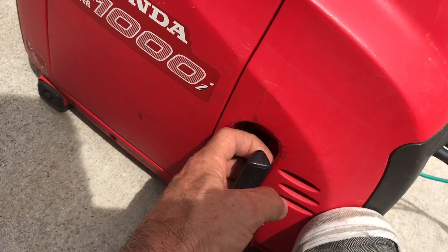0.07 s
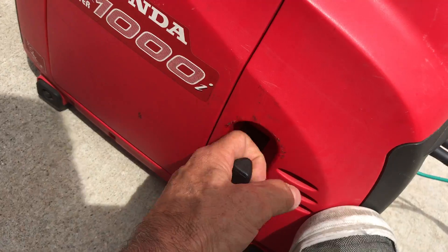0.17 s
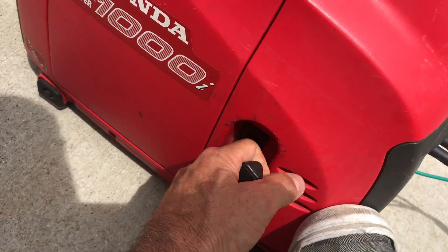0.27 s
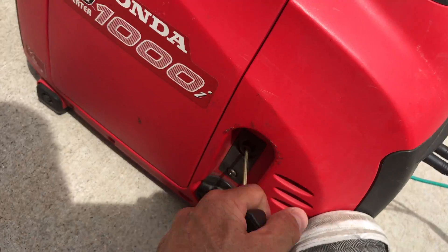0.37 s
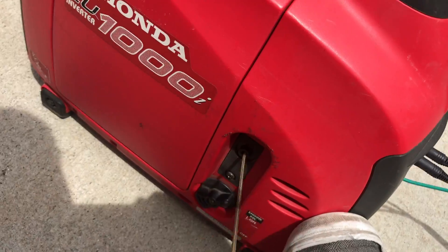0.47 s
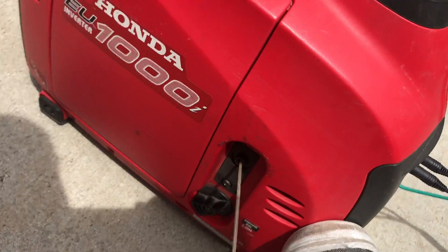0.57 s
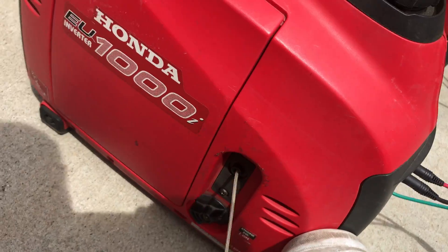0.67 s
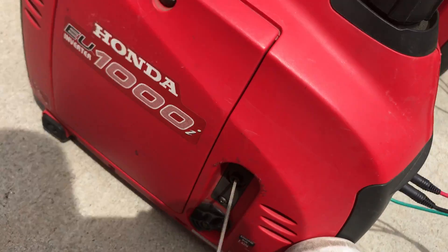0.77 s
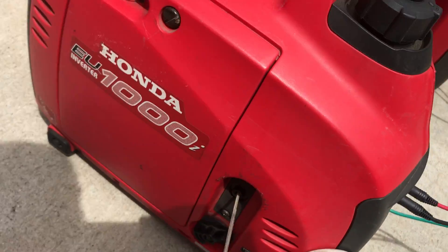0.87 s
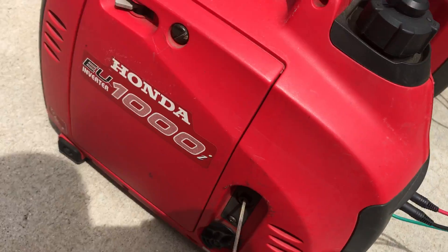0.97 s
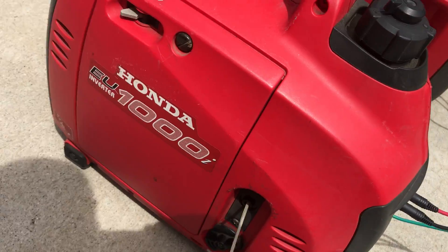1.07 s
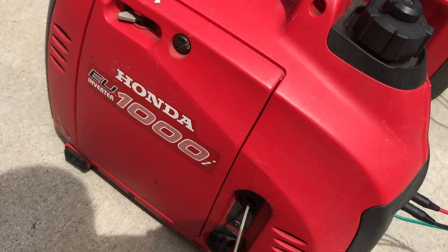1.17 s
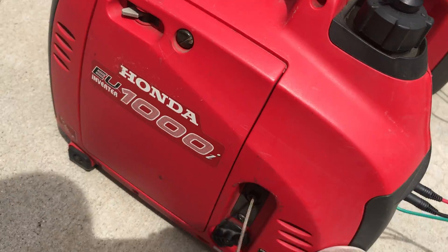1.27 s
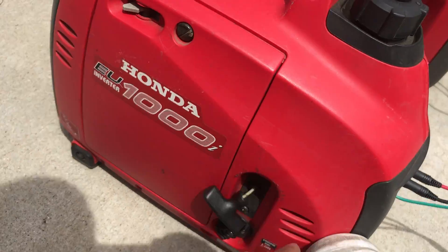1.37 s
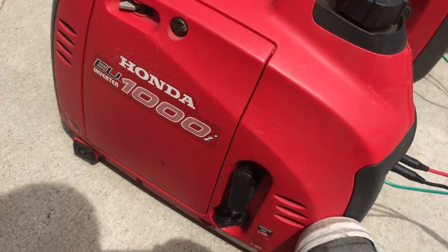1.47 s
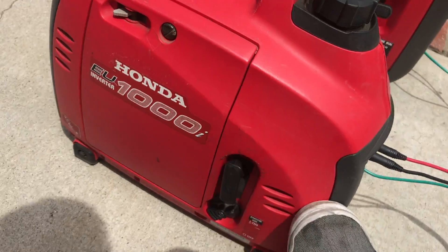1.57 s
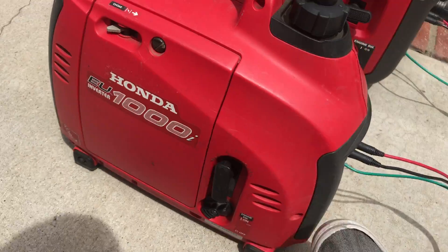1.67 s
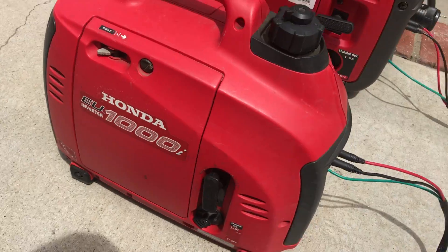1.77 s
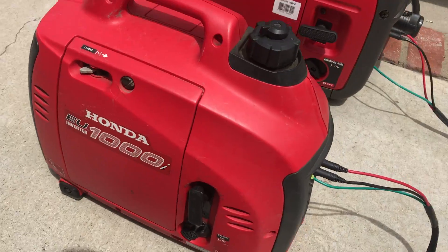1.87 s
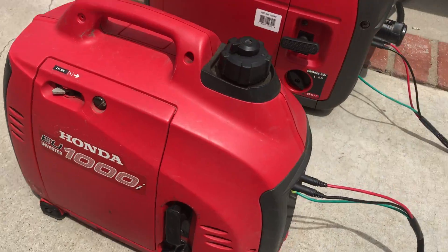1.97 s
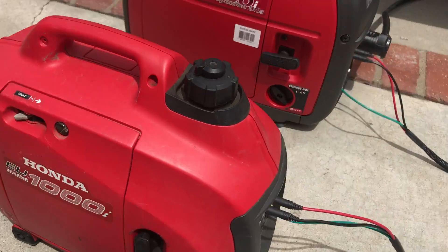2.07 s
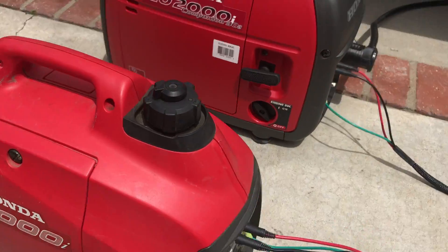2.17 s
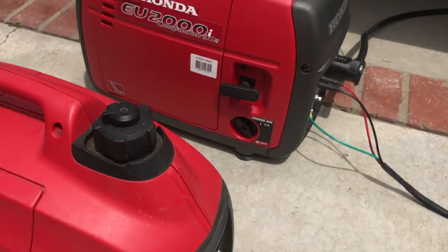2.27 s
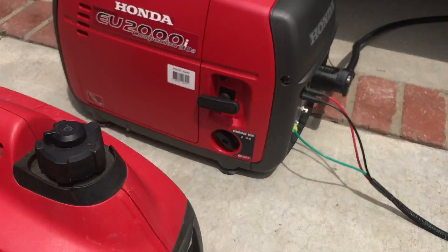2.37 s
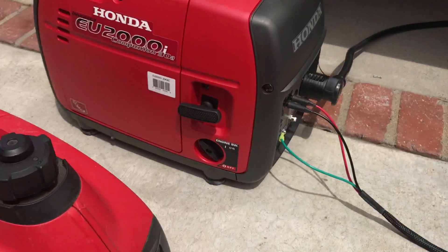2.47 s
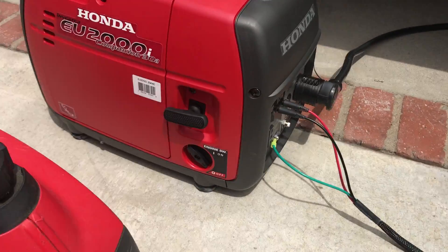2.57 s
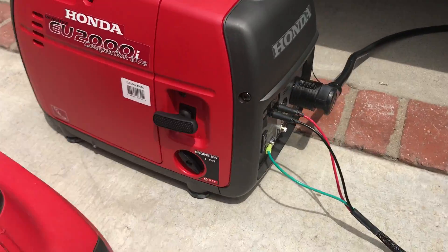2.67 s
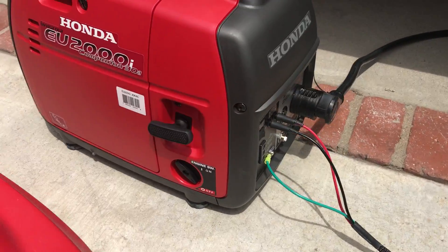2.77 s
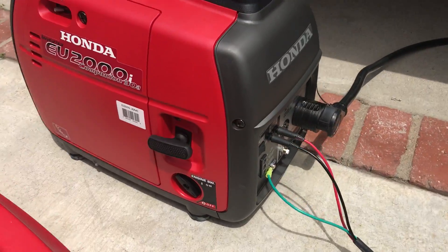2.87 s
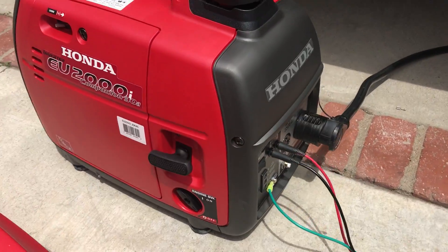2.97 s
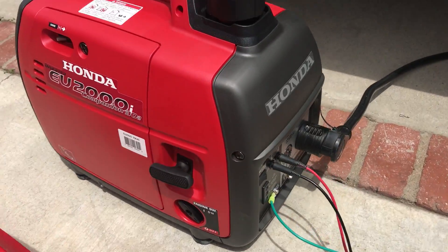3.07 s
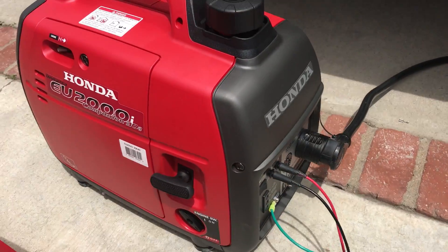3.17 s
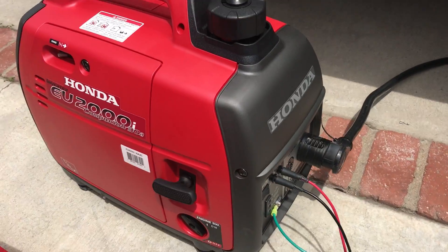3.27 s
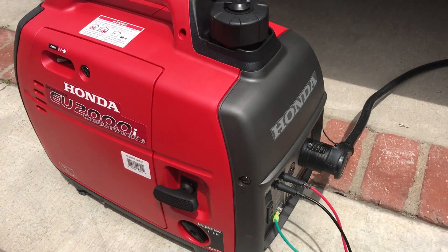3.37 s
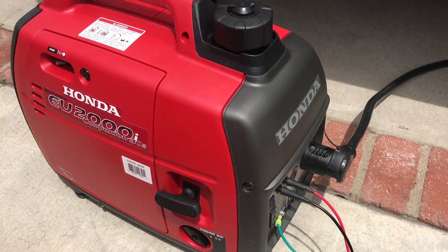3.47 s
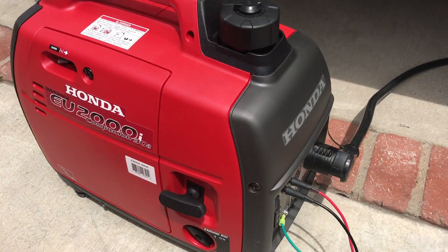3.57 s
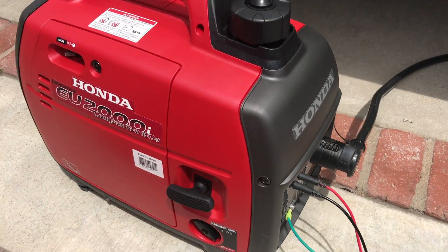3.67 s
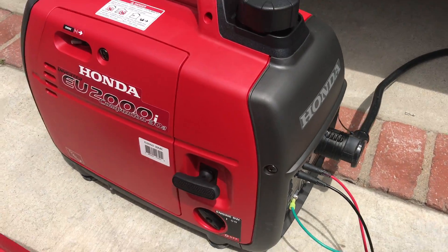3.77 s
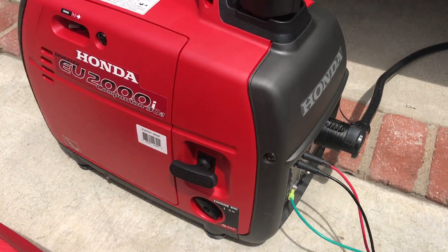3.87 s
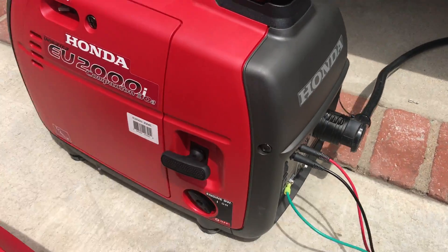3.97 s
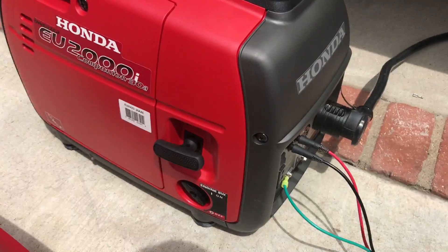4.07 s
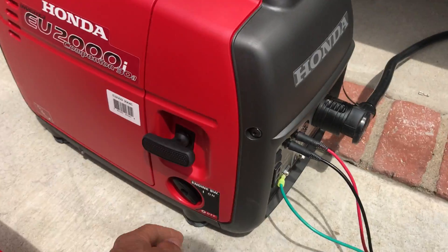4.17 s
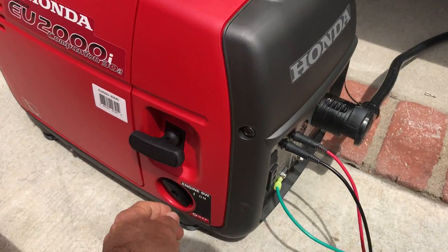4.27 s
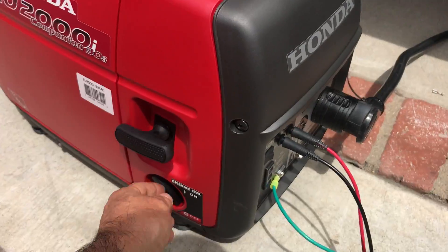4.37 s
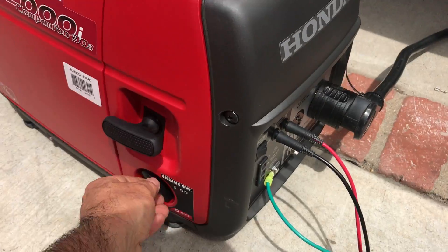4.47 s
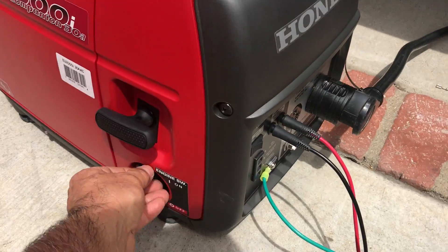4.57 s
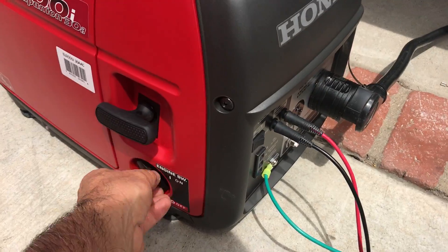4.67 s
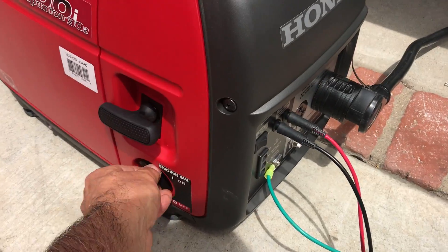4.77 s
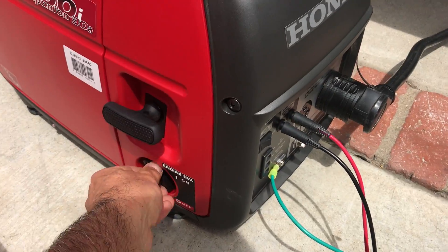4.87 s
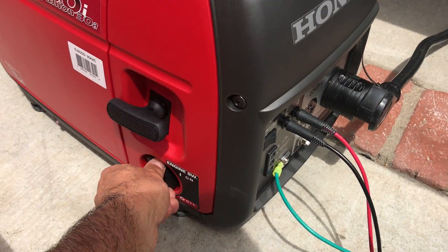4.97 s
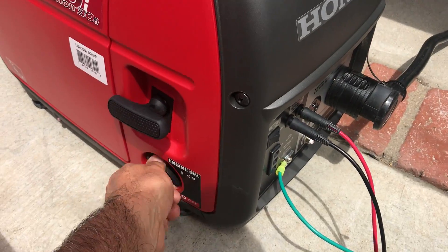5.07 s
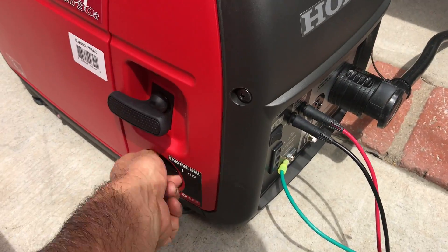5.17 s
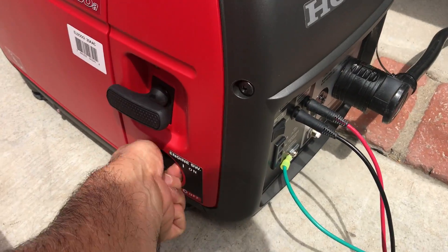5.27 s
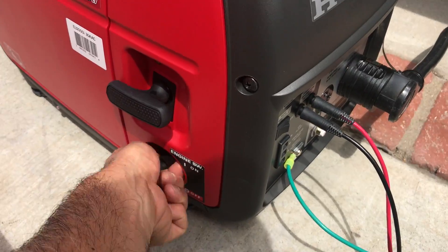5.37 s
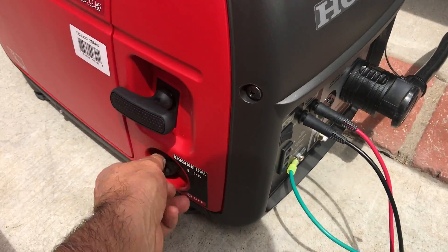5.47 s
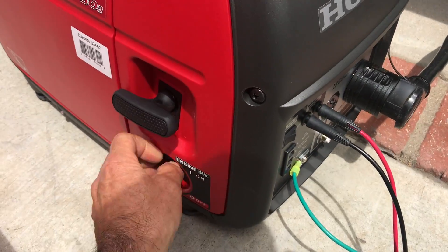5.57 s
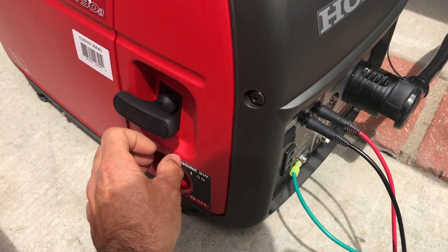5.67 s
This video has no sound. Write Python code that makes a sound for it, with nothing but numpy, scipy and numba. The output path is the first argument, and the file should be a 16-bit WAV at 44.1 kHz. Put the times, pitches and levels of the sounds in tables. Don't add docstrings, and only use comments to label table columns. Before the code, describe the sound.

Close on a concrete yard, a hand rubs and clicks the plastic grip of a small generator. The pulled cord whines upward, hard uneven firings speed up and shake the casing, the grip slaps home with a rattling bounce, and the engine settles into a steady buzzing four-stroke drone. Light wind bumps the phone microphone.

```python
import sys
import numpy as np
from scipy import signal
from scipy.fft import rfft, irfft, next_fast_len
from scipy.io import wavfile
from scipy.ndimage import uniform_filter1d
from numba import njit

SR = 44100
rng = np.random.default_rng(int(sys.argv[2]) if len(sys.argv) > 2 else 0)


def makeup_ratio(level_db):
    decades = np.asarray(level_db, float) / 20
    return 10 ** decades


def transcribe(u):
    v = np.clip(np.atleast_2d(u).T, -1, 1)
    q = np.round(v * 32767).astype(np.int16)
    wavfile.write(sys.argv[1], SR, q)


N = 252252
TIME = np.arange(N) / SR

# (pitch_hz, level_db per Hz)
COWL_SPECTRUM = [(1000, -26), (1700, -17.5), (1930, -9.5), (2380, 5), (2510, -1.5), (2590, -4),
                 (2750, -10.5), (3600, -27.5), (4680, -52), (7920, -120)]
VALVE_HISS_HZ = 8305


def curve(table):
    s, *columns = np.transpose(table)
    return [np.interp(TIME, s, c) for c in columns]


def unit(x):
    return x / np.sqrt(np.mean(x ** 2))


def noise():
    return rng.standard_normal(N)


def colour(x, points):
    size = next_fast_len(len(x))
    hz = np.maximum(np.arange(size // 2 + 1) * SR / size, 1)
    f, db = np.transpose(points)
    gain = makeup_ratio(np.interp(np.log(hz), np.log(f), db, left=-90, right=-90))
    return unit(irfft(rfft(x, size) * gain, size)[:len(x)])


@njit
def svf(x, hz, width):
    y, band, low = np.empty(len(x)), 0., 0.
    for i in range(len(x)):
        g, k = np.tan(np.pi * hz[i] / SR), width / hz[i]
        v = (band + g * (x[i] - low)) / (1 + g * (g + k))
        band, low, y[i] = 2 * v - band, low + 2 * g * v, k * v
    return y


def walk(rate):
    k = int(SR / rate)
    held = np.repeat(rng.standard_normal(2000)[:N // k + 1], k)
    return 1.06 * uniform_filter1d(uniform_filter1d(held, k), k)[:N]


def ramp(start_s, length_s):
    return np.clip((TIME - start_s) / length_s, 0, 1)


def engine():
    # (time_s, engine_db, exhaust_side_facing_phone_db)
    loudness = [(0, -45, 0), (.3, -46.5, 0), (.45, -51.5, 4), (.6, -36, 13), (.85, -32.5, 5),
                (1.0, -31.5, 6), (1.2, -28, 5.5), (1.35, -30, 7), (1.42, -29.5, -4.5), (1.55, -29, -0.5),
                (1.64, -37, 3), (1.75, -31.5, -1), (1.9, -29.5, -3), (2.66, -30.5, -1), (3.4, -31, 1),
                (4.4, -31, 0), (5.0, -30, 0.5), (5.72, -29, -2.5)]
    # (time_s, ring_hz, ring_db)
    ring_path = [(0, 1320, -6), (1.0, 1302, -6), (1.25, 1214, -9), (1.6, 1260, 3), (1.9, 1406, 2.5),
                 (2.25, 1394, 5), (2.6, 1250, 2.5), (3.0, 1394, 0.5), (4.1, 1400, -1), (4.45, 1430, -6),
                 (5.72, 1240, -10.5)]
    engine_db, facing_db = curve(loudness)
    ring_hz, ring_db = curve(ring_path)
    cycles = crank()
    running, settled, governed = ramp(.85, .11), ramp(1.4, .14), ramp(2, .35)
    loose = np.exp(-((TIME - 0.99) / 0.094) ** 2)

    mix = makeup_ratio(facing_db - 1.5) * exhaust(cycles, running, governed)
    mix = mix + governed * makeup_ratio(0.48 * ring_db) * whirr(cycles)
    casing, ring, cowl = shell(cycles, running, settled, loose, ring_hz)
    mix = mix + makeup_ratio(-1.0) * casing + makeup_ratio(ring_db - 11) * ring
    mix = mix + makeup_ratio(-3 - 0.14 * ring_db * running) * cowl
    tick_db = -52 + 1.09 * (engine_db + 29.5)
    return makeup_ratio(engine_db) * mix + makeup_ratio(tick_db) * valve_ticks(cycles, running, settled, loose)


def crank():
    # (time_s, firing_rate_hz)
    speed = [(0.6, 9), (0.9, 12.7), (1.03, 18.2), (1.14, 22.4), (1.23, 28), (1.3, 32.3), (1.36, 33.1),
             (1.45, 32.4), (1.6, 36.7), (1.7, 36.7), (1.95, 35.8), (2.09, 33.9), (2.3, 33.4), (5.72, 33.35)]
    hz, = curve(speed)
    cycles = np.cumsum(hz * (1 + .003 * walk(3))) / SR
    cycle_start_s = 3.027
    return cycles + (-np.interp(cycle_start_s, TIME, cycles)) % 1


def exhaust(cycles, running, governed):
    # (multiple_of_firing_rate, level_db)
    orders = [(1, -14), (2, -4), (3, -3.5), (4, -0.5), (5, -11.5), (6, -1), (7, -0.5), (8, -8), (9, -10),
              (10, -10), (11, -10.5), (12, -20), (13, -21), (14, -17.5), (15, -35.5), (16, -20), (17, -15),
              (18, -21.5), (19, -23.5), (20, -28), (21, -13), (22, -11.5), (23, -23), (24, -12),
              (25, -20.5), (26, -8), (27, -21), (28, -27.5), (29, -23.5), (30, -8)]
    # (time_s, once_a_crank_turn_db, twice_a_turn_db)
    thump = [(0, -4, -19), (.9, -13, -8), (1.05, -15, 2), (1.2, 1, 5.5), (1.35, 14.5, 1.5), (1.45, 9.5, 5),
             (1.8, 12.5, 2.5), (2.1, 11, 6), (2.6, 2, 3), (3.4, -8.5, 1), (5.72, 9.5, 7.5)]
    turn_db, stroke_db = curve(thump)
    tones = 0
    for order, db in orders:
        unsettled_db = -10 * (order > 7) * (1 - governed)
        extra_db = {2: turn_db, 4: stroke_db}.get(order, unsettled_db)
        drift = rng.uniform(0, 2 * np.pi) + 0.24 * walk(4.69)
        level = makeup_ratio(db + extra_db + 1.4 * walk(3.104))
        tones = tones + level * np.sin(2 * np.pi * order * cycles + drift)
    return running * tones / np.std(tones[-SR * 3:])


def whirr(cycles):
    # (pitch_hz, level_db)
    lines = [(1200, -44), (1335, -49.5), (1400, -43.5), (1868, -62.5), (2035, -50.5), (2466, -42),
             (3531, -69.5), (4296, -61), (4829, -64.5), (5437, -71.5)]
    governed_hz, tilt_db_per_khz, wobble_hz = 33.35, -1.2, 2600
    out = 0
    for hz, db in lines:
        level = makeup_ratio(db + 36 + tilt_db_per_khz * hz / 1000 + 2.6 * walk(6))
        wobble = (hz / wobble_hz) ** 2 * walk(30)
        out = out + level * np.sin(2 * np.pi * round(hz / governed_hz) * cycles + wobble)
    return out


def shell(cycles, running, settled, loose, ring_hz):
    # (pitch_hz, level_db per Hz)
    casing_spectrum = [(35, -25.5), (60, -18), (124, -11), (172, -6), (224, -4), (366, -10.5), (435, -20.5),
                       (598, -11), (681, -13), (1400, -7.5), (1900, -19), (2470, -41.5), (4180, -120)]
    knock = unit(1 + settled * (gate(cycles, 1.56, column=2) - 1)) * shake()
    rattle = clatter(cycles, 0.5 * running, 0.924) * knock
    casing = colour(rattle, casing_spectrum) * makeup_ratio(0.84 * walk(10))
    ring = unit(svf(svf(rattle, ring_hz, 280.0), ring_hz, 330.0)) * makeup_ratio(1.1 * walk(4.3))
    cowl = colour(clatter(cycles, 0.55 * running, 0.83) * knock, COWL_SPECTRUM) * makeup_ratio(.7 * walk(14))
    cup_hz = np.full(N, 2980.)
    cup = unit(svf(svf(rattle, cup_hz, 600.), cup_hz, 600.))
    return casing, ring, cowl + makeup_ratio(-8) * loose * cup


def valve_ticks(cycles, running, settled, loose):
    # (pitch_hz, level_db per Hz)
    tick_spectrum = [(1880, -22), (3200, 1.5), (3970, -5.5), (4270, -1), (4890, -4), (5130, -5.5),
                     (5560, -6.5), (6530, -16), (7530, -20.5), (8380, -22.5), (10600, -29.5),
                     (13600, -26.5), (16000, -43)]
    beat = unit(1 + settled * (gate(cycles, 0.48, column=3) - 1)) * shake() ** 0.76
    ticks = colour(clatter(cycles, .2 * running, .9) * beat, tick_spectrum) * makeup_ratio(4 * loose)
    open_share = 0.41
    valve = shake() * (0.75 + settled * (cycles % 1 < open_share))
    hiss = unit(svf(noise() * valve, np.full(N, 1. * VALVE_HISS_HZ), 840.))
    return ticks + makeup_ratio(-16.5) * running * hiss


def clatter(cycles, repeat, memory, size=1323):
    keep = np.clip(memory, 0, .98)
    fresh = rng.standard_normal((200, size))
    turns = signal.lfilter([np.sqrt(1 - keep ** 2)], [1, -keep], fresh, axis=0).ravel()
    tied = turns[(cycles * size).astype(int) % turns.size]
    share = np.clip(repeat, 0, 1)
    return np.sqrt(share) * tied + np.sqrt(1 - share) * noise()


def gate(cycles, base, column):
    # (place_in_cycle 0-1, length_in_cycle 0-1, casing_db, tick_db)
    strokes = [
        (0, 0.06, -6, 7),
        (0.102, 0.25, -12, 4),
        (.3, 1, -15, -5),
        (.5, 0, 2.5, 1),
    ]
    return base + sum(makeup_ratio(row[column]) * np.exp(-((cycles - row[0]) % 1) / row[1]) for row in strokes)


def shake():
    # (start_s, level_db over the engine)
    jolts = [(.797, -3.5), (.811, -6), (0.846, -2), (.858, 4.5), (0.885, 3.5), (.9, 5.5), (.926, 2.5),
             (0.946, -5), (0.975, 10), (0.995, 5), (1.029, 14.5), (1.09, 10), (1.143, 12), (1.186, 9.5),
             (1.222, 11.5), (1.257, 11.5), (1.29, 16.5), (1.32, 16), (1.35, 16.5), (1.387, 9.5),
             (1.4453, 11), (1.565, -6.5), (1.591, -5.5), (1.7, 5.5), (1.726, 1.5)]
    attack_s, decay_s = 0.00096, 0.011
    out = np.ones(N)
    for s, db in jolts:
        t = np.maximum(TIME - s, 0)
        out = out + makeup_ratio(db) * (1 - np.exp(-t / attack_s)) * np.exp(-t / decay_s)
    return out


def knocks():
    # (start_s, peak_db, ring_hz, edge_db, body_db)
    hits = [(0.119, -5, 800, -43, -39), (0.273, -12, 2490, -15, -30), (0.281, -2, 900, -42, -35),
            (0.285, -12, 1370, -43, -34), (0.618, -21.5, 250, -30, 14), (1.4768, 17.5, 1160, -26, -17),
            (1.483, 9, 1020, -35, -25), (1.488, 16, 1380, -35, -7.5), (1.4928, 12.5, 1310, -13, -11),
            (1.4985, 9.5, 2420, -25, -12), (1.503, 12.5, 2290, -48, -5.5), (1.509, 9, 1300, -40, -16),
            (1.513, 10, 2158, -47, -8), (1.533, 4.5, 1480, -35, -12), (1.532, -15.5, 5900, -16, -25)]
    size = 3000
    out, t = np.zeros(N), np.arange(size) / SR
    attack_s, decay_s = .0007, 0.0046
    for s, db, ring_hz, edge_db, body_db in hits:
        blow = rng.standard_normal(size) * np.minimum(t / attack_s, 1) * np.exp(-t / decay_s)
        # (pitch_hz, width_hz, level_db)
        parts = [(ring_hz, 220, 0), (1350, 500, -4), (2400, 350, -5), (900, 400, -8),
                 (250, 250, body_db), (5000, 5000, edge_db)]
        hit = 0
        for hz, width, part_db in parts:
            centre = np.full(size, 1. * hz)
            band = svf(svf(svf(blow, centre, 1. * width), centre, 2. * width), centre, 7.7 * width)
            band = band * np.exp(-t * hz / 2500.)
            hit = hit + makeup_ratio(part_db) * band / np.abs(band).max()
        at = int(s * SR)
        out[at:at + size] += makeup_ratio(db - 22.0) * hit
    return out


def whines():
    # (time_s, pitch_hz, level_db)
    tones = [
        [(.7, 1360, -57), (.73, 1400, -32), (.77, 1424, -37.5), (.81, 1674, -37), (.86, 1970, -34),
         (.89, 2220, -44)],
        [(.89, 925, -48), (.91, 953, -32), (.96, 1000, -30), (1.0, 1090, -55)],
        [(.96, 1280, -36), (.985, 1310, -33), (1.03, 1393, -29), (1.06, 1380, -40)],
        [(.62, 2000, -46), (.7, 2270, -44), (.77, 2850, -45), (.82, 3110, -52)],
    ]
    out = 0
    for table in tones:
        hz, db = curve(table)
        phase = 2 * np.pi * np.cumsum(hz * (1 + 0.049 * walk(120))) / SR
        on = (TIME > table[0][0]) & (TIME < table[-1][0])
        out = out + on * makeup_ratio(db + 3.5 * walk(58.9)) * np.sin(phase)
    return out


def wind():
    # (middle_s, length_s, level_db)
    gusts = [
        (0.22, 0.43, -43),
        (0.664, 0.068, -38),
        (0.89, .06, -39),
        (1.257, 0.29, -25.5),
        (2.2, 0.33, -40),
        (2.825, 0.055, -39),
        (4.597, 0.054, -36),
        (4.874, 0.057, -34),
        (5.372, .05, -55),
        (5.615, 0.05, -35),
    ]
    # (pitch_hz, level_db)
    spectrum = [(22, -28.5), (32, -12.5), (52, -1.5), (65, -2.5), (95, -5.5), (160, -16), (330, -22.5)]
    strength = makeup_ratio(-50.5) + sum(makeup_ratio(db) * np.exp(-((TIME - s) / length) ** 2) for s, length, db in gusts)
    return strength * makeup_ratio(2.4 * walk(17.0)) * colour(noise(), spectrum)


def hand_rubs():
    # (start_s, length_s, level_db)
    rubs = [
        (0, 0.1, -54),
        (0.135, 0.037, -53),
        (0.191, 0.073, -47),
        (0.336, 0.066, -51),
        (.475, 0.061, -49.5),
    ]
    touch = sum(makeup_ratio(db) * ((TIME > s) & (TIME < s + length)) for s, length, db in rubs)
    return uniform_filter1d(touch, size=300) * makeup_ratio(4.7 * walk(69.5)) * colour(noise(), COWL_SPECTRUM)


def yard():
    # (pitch_hz, level_db per Hz)
    hum_spectrum = [(120, -30), (200, 7), (458, -10), (528, -0.5), (1400, -15), (1740, -52.5), (2290, -1.5),
                    (3570, -27), (9000, -51.5), (11700, -83), (19800, -120)]
    hum = makeup_ratio(-53 + 2.4 * walk(8.6)) * colour(noise(), hum_spectrum)
    whistle = unit(svf(noise(), np.full(N, 1. * VALVE_HISS_HZ), 160.))
    return hum + makeup_ratio(-87.5) * whistle


def scene():
    hiss = makeup_ratio(-78.5) * noise()
    return (engine() + knocks() + whines() + wind() + hand_rubs() + yard() + hiss)[None]


def low_pass(x):
    return signal.sosfilt(signal.butter(12, 16490, fs=SR, output="sos"), x)


def record(dry):
    held = dry / (1 + np.abs(dry / .72) ** 6) ** (1 / 6)
    return low_pass(held)


dry = scene()
out = record(dry)
transcribe(out)
```